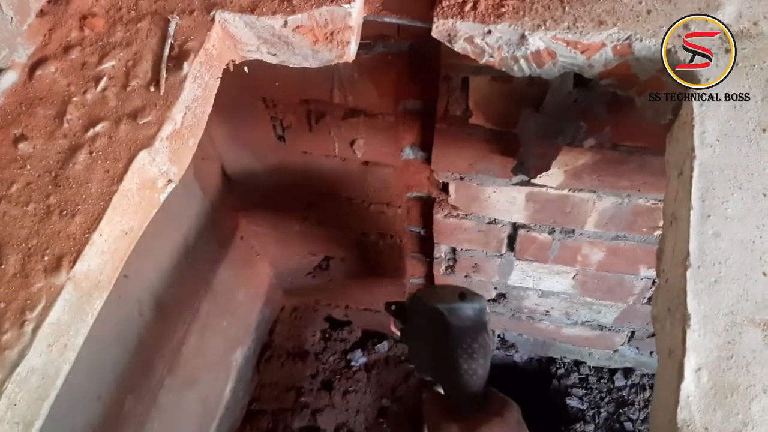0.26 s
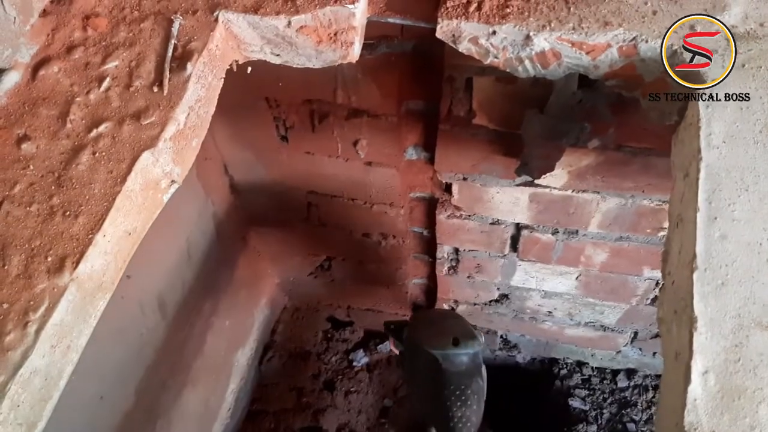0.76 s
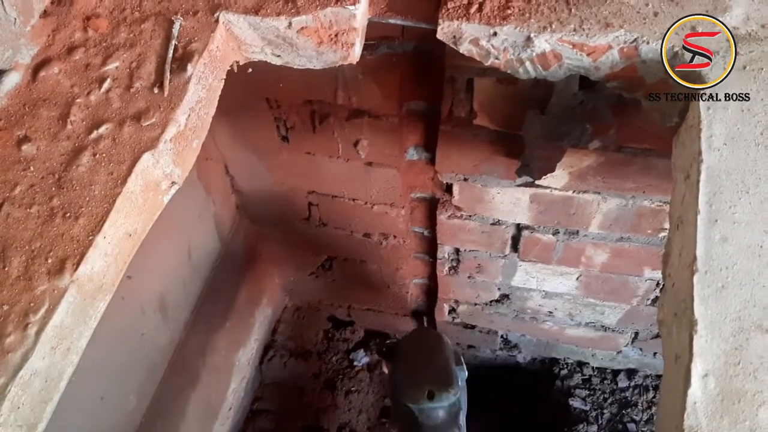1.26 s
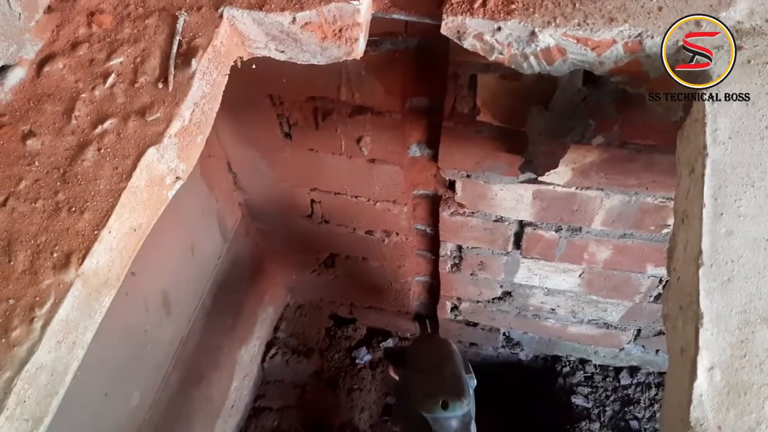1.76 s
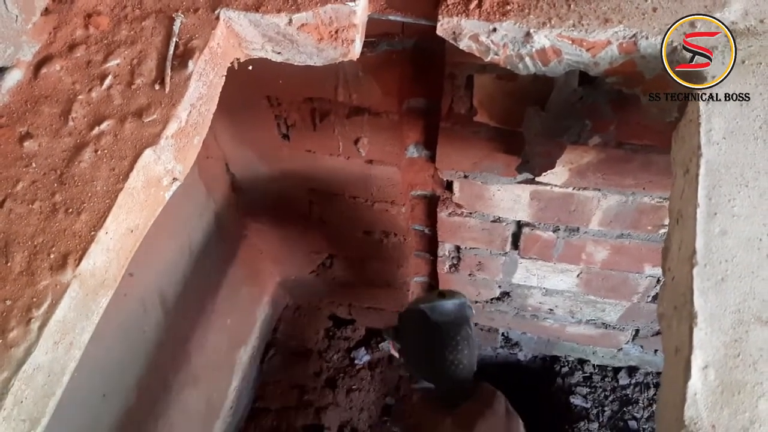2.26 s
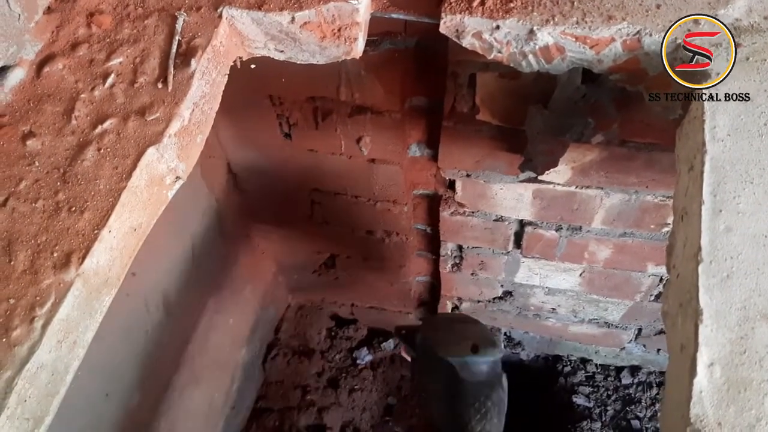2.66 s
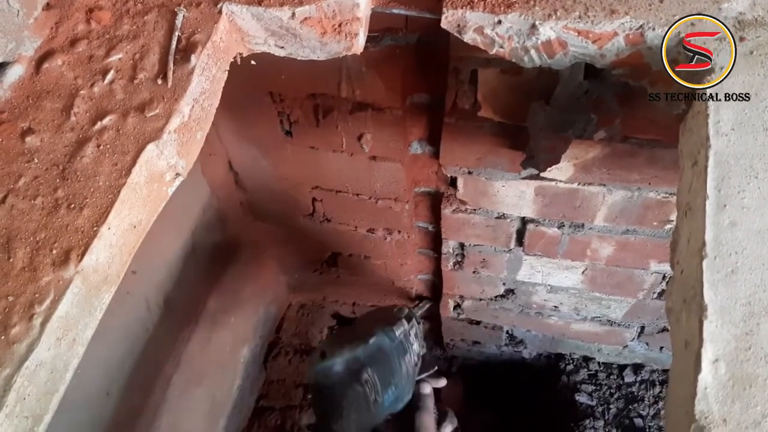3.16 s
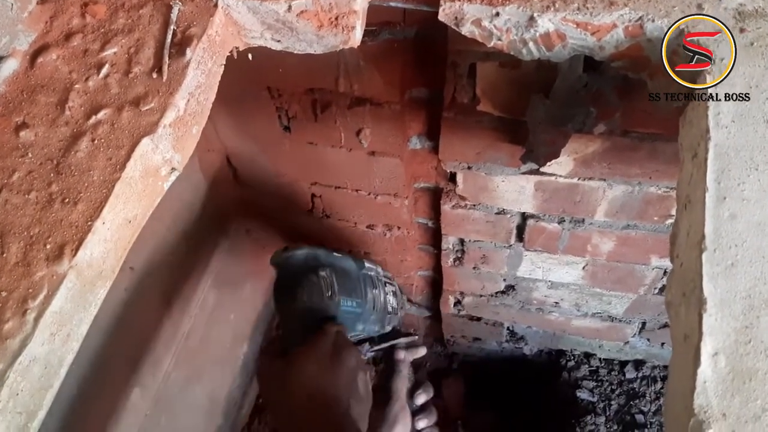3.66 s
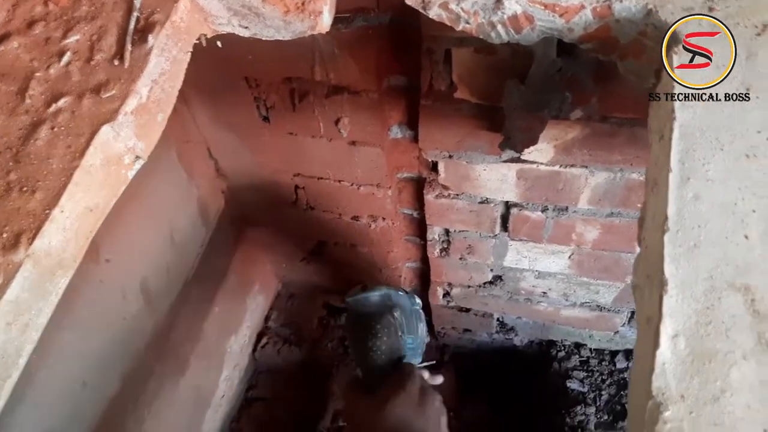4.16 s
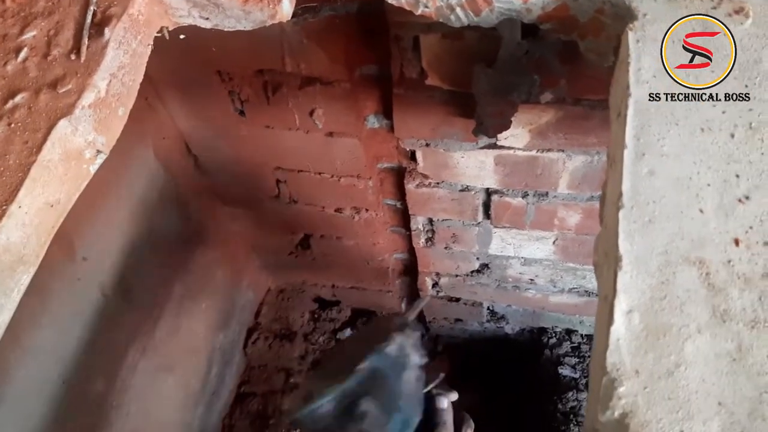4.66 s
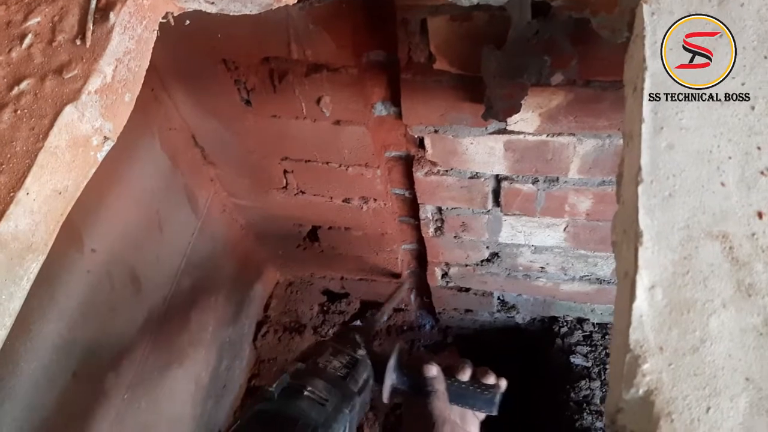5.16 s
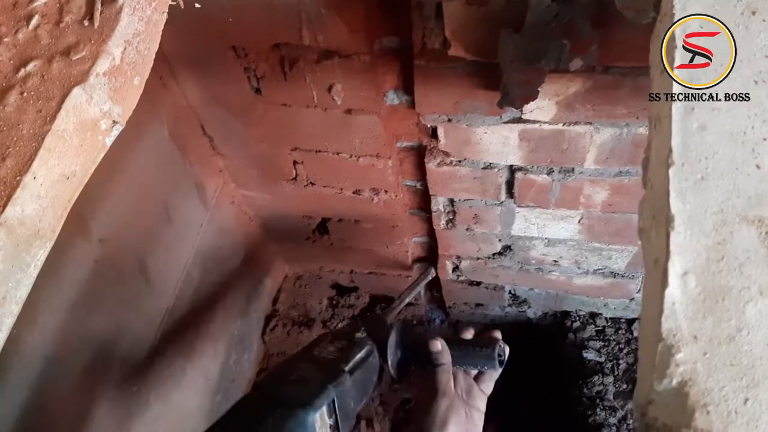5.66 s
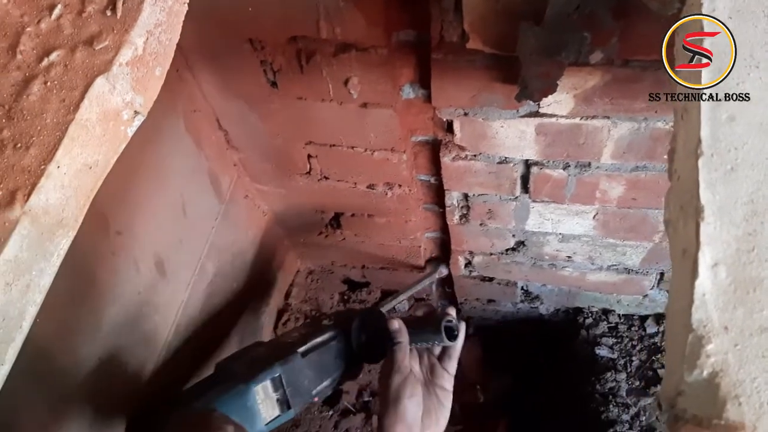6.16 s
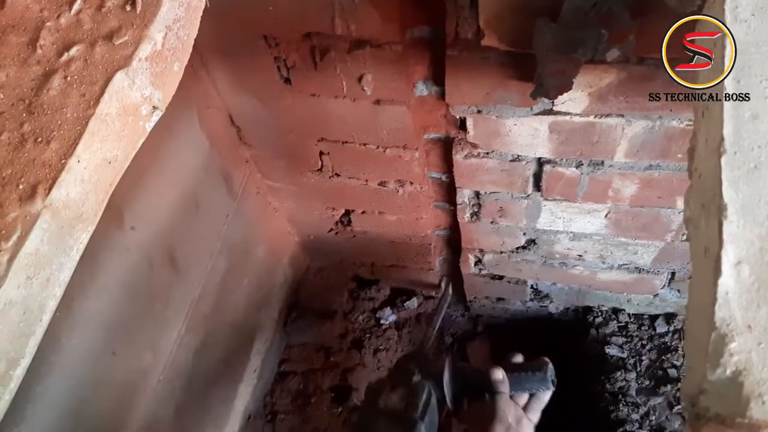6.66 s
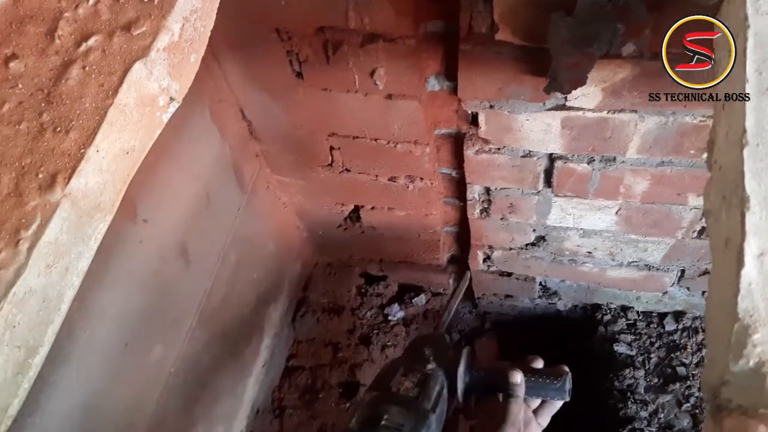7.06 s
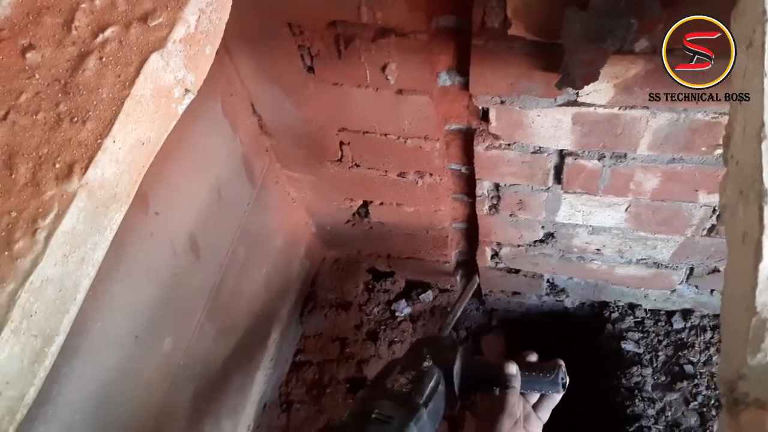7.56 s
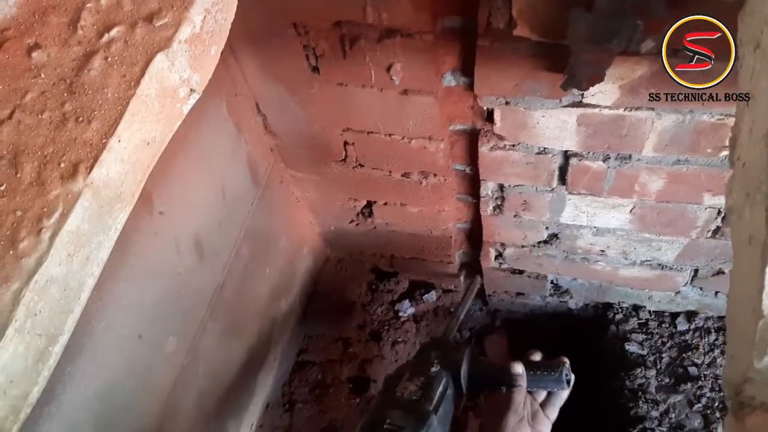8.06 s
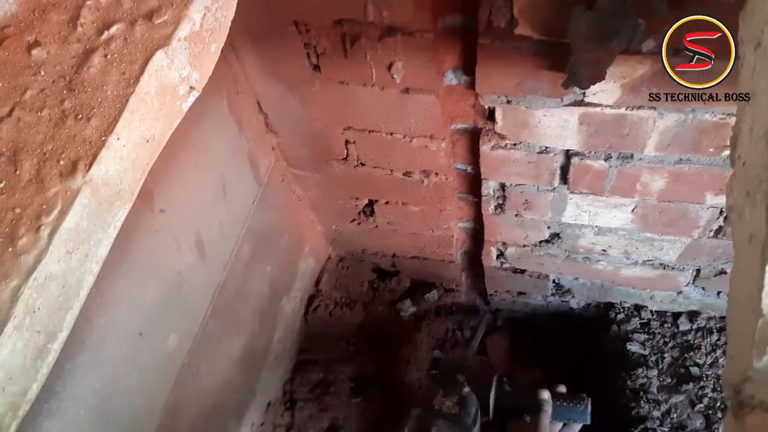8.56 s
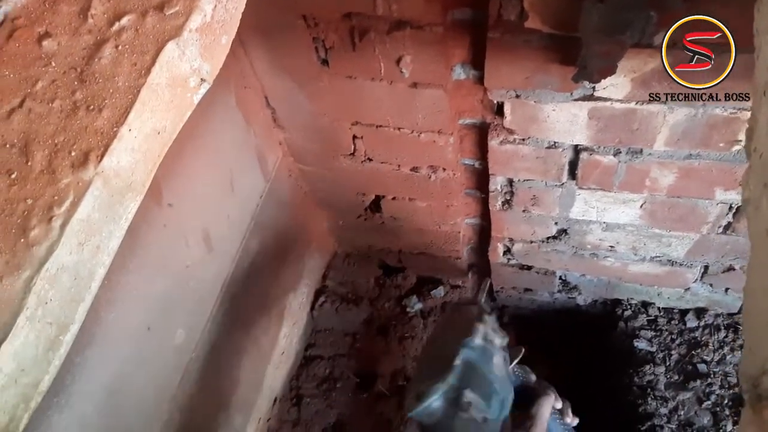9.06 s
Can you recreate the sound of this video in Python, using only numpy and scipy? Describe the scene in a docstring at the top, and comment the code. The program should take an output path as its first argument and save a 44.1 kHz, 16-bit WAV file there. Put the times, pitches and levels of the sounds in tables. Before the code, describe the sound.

Close, harsh hammer-drill chiselling on brick in a small walled alcove: a long roar, then shrinking bursts separated by whirring, clanking run-downs and near silence.

```python
"""A small plastered alcove: an electric chipping hammer chisels brick, one long run and then three bursts.
Every crank turn fires the striker: shaped impulses crack the brick, ring the steel and thud in the wall.
After each release the motor coasts down with clacking gears: noise and tooth tones timed by the crank angle.
Chips thump the microphone; noise bursts knock on brick, hard as each burst starts, faintly in the pauses.
The near walls answer with short, dense decaying noise; a low rumble lies in the distance."""
import sys
import numpy as np
from scipy import signal
from scipy.fft import rfft, irfft, next_fast_len
from scipy.io import wavfile
from scipy.ndimage import uniform_filter1d, map_coordinates

SR = 44100
rng = np.random.default_rng(int(sys.argv[2]) if len(sys.argv) > 2 else 0)


def output_pcm(signal):
    """Save a mono or channel-first signal as 16-bit PCM at the path in sys.argv[1].

    Samples are clipped to [-1, 1] before scaling.
    """
    pcm = np.clip(np.atleast_2d(signal).T, -1, 1) * 32767
    wavfile.write(sys.argv[1], SR, np.round(pcm).astype(np.int16))


N = 410571


def amp(db):
    """Decibels to gain."""
    return 10 ** (np.asarray(db) / 20)


def unit(x):
    """Scale to rms 1."""
    return x / np.sqrt(np.mean(x ** 2) + 1e-20)


def steady(x):
    """Level x to about rms 1 over every tenth of a second, keeping the single blows."""
    power = np.mean(x ** 2, axis=0)
    power = uniform_filter1d(uniform_filter1d(power, size=3500), size=3500)
    return x / np.sqrt(np.abs(power) + np.mean(power) / 10 ** 4)


def along(points, hz):
    """Read (frequency [Hz], value) points on a log frequency axis."""
    f, v = np.transpose(points)
    return np.interp(np.log(hz + 1), np.log(f + 1), v)


def curves(rows):
    """One value per sample for each column after the time."""
    s, *cols = np.transpose(rows)
    return [np.interp(np.arange(N) / SR, s, c) for c in cols]


def wobble(rate):
    """A smooth random curve with this many knots a second."""
    knots = rng.standard_normal(int(N * rate / SR) + 4)
    return map_coordinates(knots, [np.arange(N) * rate / SR])


def filtered(x, response):
    """Multiply the spectrum of x by a complex response of frequency."""
    length = x.shape[-1]
    size = 2 * next_fast_len((length + SR // 2) // 2)
    spectrum = rfft(x, size) * response(np.fft.rfftfreq(size, 1 / SR))
    return irfft(spectrum, size)[..., :length]


def colour(x, points):
    """Causal minimum-phase filter with the gain of (frequency [Hz], level [dB]) points."""
    def response(hz):
        cepstrum = irfft(np.log(amp(along(points, hz))))
        cepstrum[1:len(hz) - 1] *= 2
        cepstrum[len(hz):] = 0
        return np.exp(rfft(cepstrum))
    return filtered(x, response)


def resonate(x, modes):
    """Pass x through (frequency [Hz], width [Hz], level [dB]) resonances of alternating sign."""
    def response(f):
        total = 0
        for k, (c, w, db) in enumerate(modes):
            total = total + (-1) ** k * amp(db) * 1j * f * w / (c * c - f * f + 1j * f * w)
        return total
    return filtered(x, response)


def fade(x, life):
    """Every impulse dies away with this time constant in seconds."""
    return signal.lfilter([1], [1, -np.exp(-1 / (life * SR))], x)


def noise(side_db):
    """Stereo white noise, partly shared by both channels."""
    mid, side = rng.standard_normal((2, N))
    return unit(np.array([mid + amp(side_db) * side, mid - amp(side_db) * side]))


def swell(turns, share, width):
    """A smooth bump once a turn, centred on this share of the turn."""
    return np.exp(-.5 * (((turns - share + .5) % 1 - .5) / width) ** 2)


# how long the near plaster walls answer: (frequency [Hz], 60 dB decay time [s])
WALL_DECAY = [(150, 0.3), (1500, 0.11), (6000, 0.18), (15000, 0.014)]


def alcove(x, wet_db):
    """Direct sound plus the short, dense answer of the near walls."""
    hz, t, z = signal.stft(rng.standard_normal((3, SR // 3)), SR, nperseg=256)
    decay = amp(-60 * t / along(WALL_DECAY, hz)[:, None])
    left, right, shared = signal.istft(z * decay, SR, nperseg=256)[1]
    tail = np.array([left, right]) + 0.94 * shared
    tail = tail / np.linalg.norm(tail[0])
    return x + amp(wet_db) * signal.fftconvolve(np.atleast_2d(x), tail, axes=1)[:, :N]


def roaming(x, wet_db):
    """The answer of the walls keeps changing as the tool moves about."""
    angle = 2 * wobble(2)
    return np.cos(angle) ** 2 * alcove(x, wet_db) + np.sin(angle) ** 2 * alcove(x, wet_db)


# the crank: top speed, gain on a firmly seated chisel and bearing drag [turns per s]
FULL_SPEED, SEATED_GAIN, DRAG = 66.3, 1.4, 9.7
SEATED_UNTIL_S = 1.57
# pulls of the trigger: (pressed [s], released [s], spin-up time constant [s],
# coasting time constant [s], crank angle at release [turns])
TRIGGER_PULLS = [(-2, 2.157, .2, .9315, .31), (3.21, 4.1993, .208, .7035, .451),
                 (6.01, 6.467, .19, .7007, .301), (7.975, 8.2636, .18, .6924, .913)]


def motor():
    """Speed swells to its top under the trigger, then friction brakes it: speed, turns, drive 0-1, run."""
    t = np.arange(N) / SR
    speeds, turns = [], []
    for on, off, spin_up, coast, angle in TRIGGER_PULLS:
        held = np.clip(np.minimum(t, off) - on, 0, None)
        driven = FULL_SPEED * (1 - np.exp(-(held / spin_up) ** 1.5))
        driven = driven + SEATED_GAIN * (t < SEATED_UNTIL_S)
        # constant drag brings the coasting crank to a full stop
        speed = np.maximum((driven + DRAG) * np.exp(-np.maximum(t - off, 0) / coast) - DRAG, 0)
        turned = np.cumsum(speed) / SR
        speeds.append(speed)
        turns.append(turned - np.interp(off, t, turned) + angle)
    run = np.argmax(speeds, axis=0)
    drive = uniform_filter1d(1.0 * (t < np.array(TRIGGER_PULLS)[run, 1]), size=2200)
    return np.choose(run, speeds), np.choose(run, turns), drive, run


BITE_ATTACK_S = 0.0067
# the chisel is leaned into the brick: (start [s], end [s], release [dB per s],
# then relative levels: crack [dB], thud [dB], ring [dB], housing buzz [dB])
LEANED_BITES = [(-.1, 0.54, 63, -30, -46, -28.5, -29.5), (0.577, 1.57, 143.5, -27.5, -30.5, -29.5, -29),
                (1.596, 2.241, 297, -28, -32.5, -25.5, -38.5), (3.41, 3.537, 66, -32.5, -57, -30.5, -39.5),
                (3.55, 3.86, 198.5, -31.5, -33, -27, -37.5), (3.863, 4.3, 272, -28, -31.5, -27, -40.5),
                (4.458, 4.58, 95.5, -35, -49, -39, -48), (6.196, 6.31, 96.5, -35.5, -33, -29.5, -61),
                (6.299, 6.37, 139.5, -37.5, -28, -26.5, -54.5),
                (6.481, 6.55, 166, -31.5, -31.5, -28, -60.5), (6.59, 6.841, 244, -34.5, -46, -38, -68),
                (8.146, 8.401, 258, -32, -31.5, -27.5, -66), (8.44, 8.503, 322, -37, -32.5, -27.5, -67.5)]


def bites():
    """Gains of crack, thud, ring and buzz: each bite sets in quickly, holds and dies away."""
    t = np.arange(N) / SR
    gains = np.zeros((4, N))
    for start, end, release, *levels_db in LEANED_BITES:
        attack = np.clip((t - start) / BITE_ATTACK_S + .5, 0, 1)
        shape = attack * amp(-abs(release) * np.maximum(t - end, 0))
        gains = np.maximum(gains, amp(levels_db)[:, None] * shape)
    return gains


# the unloaded striker only taps; rows crack, thud, ring:
# (level against the gears [dB], loss per halving of the speed [dB])
IDLE_TAPS = [(-6, 6.5), (-5.5, 8), (-23.5, 1)]


def blow_gains(pressed, gear_db, halvings):
    """Add the power of the idle taps, which weaken with the speed, to that of the bites."""
    return [np.hypot(gain, amp(gear_db + db - slope * halvings))
            for gain, (db, slope) in zip(pressed, IDLE_TAPS)]


def impacts(turns, pattern, scatter_db, jitter):
    """An impulse whenever the crank passes a point of the pattern; jitter in seconds."""
    out = np.zeros(N)
    for share, db in pattern:
        at = np.flatnonzero(np.diff(np.floor(turns - share)))
        size, late = rng.uniform(-1.1, 1, (2, len(at)))
        landed = np.round(at + late * jitter * SR).astype(int)
        out[np.clip(landed, 0, N - 1)] += amp(db + scatter_db * size)
    return out


def disperse(x, spread):
    """Bending waves in the steel carry the treble ahead of the bass."""
    return filtered(x, lambda hz: np.exp(-1j * spread * np.sqrt(hz)))


def tint(x, db):
    """Tilt the sound towards the treble or the bass from moment to moment."""
    treble = filtered(x, lambda hz: hz ** 2 / (hz ** 2 + 2800 ** 2))
    return amp(db) * treble + amp(-db) * (x - treble)


def shifted(x, hz):
    """Move every frequency of x by a curve of hertz."""
    analytic = signal.hilbert(x, next_fast_len(N))[..., :N]
    return np.real(analytic * np.exp(2j * np.pi * np.cumsum(hz) / SR))


TINT_DB = 7  # scale of the random tilt of loose blows
# impacts within a crank turn: (share of the turn, relative level [dB])
STROKE_IMPACTS = [(0.237, -7.5), (0.283, -16), (0.373, 1), (0.469, -9), (0.689, -16)]
# spectra of cracking brick, thudding wall and ringing steel: (frequency [Hz], relative level [dB])
CRACK_SPECTRUM = [(400, -11), (800, -0.5), (1200, 3.5), (2000, -0.5), (3200, -4), (4200, 0), (5800, -7.5),
                  (8300, -6.5), (9500, -15), (11000, -10.5), (16000, -15)]
THUD_SPECTRUM = [(40, -26.5), (110, -0.5), (190, -11), (300, 3.5), (450, 1.5), (650, -3.5), (1200, -5),
                 (3000, -44.5)]
STEEL_SPECTRUM = [(7000, -42), (8400, -18), (9500, -27.5), (11300, -8.5), (12300, 2), (13300, -5),
                  (14400, -7), (15400, -11), (16500, -17.5)]
# ringing of the chisel: (frequency [Hz], width [Hz], relative level [dB])
CHISEL_MODES = [(12310, 55, 0), (12550, 290, -16), (15300, 250, -16)]
# its lower modes, free when it is held at a slant: (frequency [Hz], width [Hz], relative level [dB])
SLANT_MODES = [(5400, 400, -11), (8370, 240, -1.5)]
# pressure on the chisel detunes its ring: (time [s], shift [Hz])
RING_SHIFT = [(0, -100), (.42, 170), (1.35, -280), (1.9, 260), (2.2, 60), (4.05, 0)]


def chisel(turns, speed, loose, crack_gain, thud_gain, ring_gain):
    """Each blow cracks the brick, rings the steel and thuds in the wall."""
    # a loose chisel smears its blows and chatters between them
    blows = impacts(turns, STROKE_IMPACTS, scatter_db=2.5, jitter=.00005)
    between = [(.1, -8.5), (.55, -10), (.9, -11.5)]
    chatter = loose * impacts(turns, between, scatter_db=11.0, jitter=0.0019)
    hits = (blows + chatter) * amp(1.2 * loose * wobble(35))
    firm = np.clip((speed - 35) / 30, 0, 1)
    # at a crawl the striker no longer reaches the chisel
    reach = np.clip((speed - 17) / 18, 0, 1)

    grind = 0.05 + reach * (0.2 + .5 * loose) * swell(turns, 0.42, width=0.085)
    crumble = (firm * fade(hits, life=0.0005) + grind) * noise(side_db=-4)
    shock = disperse(firm * hits, spread=0.4777)
    crack = tint(colour(3.6 * shock + crumble, CRACK_SPECTRUM), TINT_DB * loose * wobble(45))
    crack = steady(roaming(crack, wet_db=-2))

    sting_shape = reach * fade(hits, life=0.00086) + 0.077 * reach * swell(turns, 0.39, width=0.14) + .01
    sting = sting_shape * noise(side_db=2.5)
    ring = steady(colour(sting, STEEL_SPECTRUM))
    # only hard blows wake the chisel's own clear note
    hard = np.clip(ring_gain / amp(-28), 0, 1)
    ring = ring + hard * amp(-9 + 12 * loose) * steady(resonate(sting, CHISEL_MODES))
    ring = shifted(ring, curves(RING_SHIFT)[0])
    slant_db = np.interp(np.arange(N) / SR, [2.5, 4.5], [-22, -6])
    ring = ring + amp(slant_db) * steady(resonate(sting, SLANT_MODES))
    ring = steady(alcove(ring, wet_db=0.0))

    thud = steady(colour(4 * shock + crumble, THUD_SPECTRUM))
    return amp(4.0) * crack_gain * crack + amp(4.5) * ring_gain * ring + amp(-0.5) * thud_gain * thud


BUZZ_WANDER_DB = 2.5  # each line swells and sinks as the grip shifts
STRIKE_AT = .385  # the striker lands at this share of the crank turn
# lines of the buzz: (multiple of the crank speed, relative level [dB])
BUZZ_LINES = [(2, -11), (3, -4.5), (4, -13.5), (5, -1), (6, -2.5), (7, 0), (9, -7.5), (10, 1), (11, -1),
              (12, 0), (13, 4), (16, 3.5), (18, 1), (19, -0.5), (23, 1.5), (28, 2.5), (30, -10.5),
              (32, 3.5), (34, 0), (35, -3)]


def buzz(turns):
    """The housing shakes at exact multiples of the stroke rate, all kicked together by the blow."""
    lines = 0
    for order, db in BUZZ_LINES:
        # the two channels hear each line at slightly different phases
        phase = .7 * rng.standard_normal() + .5 * rng.standard_normal((2, 1))
        level = amp(db + BUZZ_WANDER_DB * wobble(2.5))
        lines = lines + level * np.sin(2 * np.pi * order * (turns - STRIKE_AT) + phase)
    return unit(lines)


# blows that land squarely: (time [s], relative level [dB])
SQUARE_BLOWS = [(6.186, -22), (6.271, -17), (6.311, -16.5), (6.323, -16), (6.341, -13.5), (6.357, -17),
                (6.374, -23), (6.405, -13.5), (6.5, -18), (8.191, -17.5), (8.296, -22), (8.331, -12)]
# their spectrum: (frequency [Hz], relative level [dB])
SQUARE_SPECTRUM = [(80, -17), (280, 4.5), (550, 2), (1100, -7.5), (4500, -15), (12000, -35)]


def punches():
    """A blow that lands squarely thumps the wall and cracks the brick: a decaying noise burst."""
    hits = np.zeros(N)
    for s, db in SQUARE_BLOWS:
        hits[round(s * SR)] = amp(db)
    burst = fade(hits, life=0.0032) * unit(colour(noise(side_db=-4.5), SQUARE_SPECTRUM))
    return alcove(burst, wet_db=-9)


def drifting(turns, rows, life):
    """Each blow excites a narrow resonance whose pitch drifts as the chisel works on."""
    hz, db = curves(rows)
    t = np.arange(N) / SR
    ringing = unit(fade(swell(turns, .38, width=.08) * noise(side_db=-2), life))
    present = (t > rows[0][0]) * (t < rows[-1][0])
    return present * amp(db) * ringing * np.sqrt(2) * np.sin(2 * np.pi * np.cumsum(hz) / SR)


# three drifting resonances: (time [s], pitch [Hz], level [dB])
# shrill, sinking as the chisel works deeper
SHRILL_DRIFT = [(.5, 7980, -54), (.85, 7460, -38), (1.1, 7250, -35.5), (1.301, 6880, -33),
                (1.42, 6850, -34), (1.6, 6800, -59)]
# the brick under the chisel sounds hollow
HOLLOW_DRIFT = [(3.38, 519, -65), (3.469, 519.5, -38), (3.75, 629.5, -31), (4.149, 615, -36),
                (4.6, 561, -63.5), (4.8, 560, -110), (6.1, 450, -110), (6.2, 450, -49), (6.3, 458.6, -35.5),
                (6.7, 451, -39.5), (7.1, 450, -77)]
# the housing moans as the first burst after the long run is leaned on
MOAN_DRIFT = [(3.6, 1750, -42.5), (4.15, 1715, -37.5), (4.35, 1700, -43)]


def work_resonances(turns):
    """Shrill, hollow and moaning resonances, each shaken by the blows."""
    shrill = drifting(turns, SHRILL_DRIFT, life=0.0011)
    hollow = drifting(turns, HOLLOW_DRIFT, life=0.0064)
    return shrill + hollow + drifting(turns, MOAN_DRIFT, life=0.005)


# the chisel rebounds freely: (time [s], relative level [dB])
REBOUNDS = [(4.28, -17), (6.311, -16), (6.472, -22), (8.128, -10), (8.191, -15), (8.281, -15), (8.37, -15),
            (8.451, -14), (8.496, -19)]
# its bending modes: (frequency [Hz], relative level [dB], 60 dB decay time [s])
BENDING_MODES = [(5200, -9, 0.03), (8490, -7, .05), (12315, 5, .11)]


def pings():
    """A rebound leaves the steel free to ring in decaying sines."""
    out = np.zeros(N + SR)
    t = np.arange(SR // 4) / SR
    for s, db in REBOUNDS:
        ring = sum(amp(db + level - 60 * t / t60) * np.sin(2 * np.pi * hz * t)
                   for hz, level, t60 in BENDING_MODES)
        out[round(s * SR):][:len(t)] += (1 - np.exp(-t / 0.0023)) * ring
    return out[:N]


# the gears: relative level at top speed [dB], extra loss per halving of the speed while pulled tight [dB]
GEAR_DB, DRIVEN_SLOPE_DB = -30, 2.5
# below this speed [turns per s] the rattle dies out, by so many more dB per halving
CRAWL_SPEED, CRAWL_SLOPE_DB = 22.9, 9.5


def gear_level(halvings, speed, drive, coast_slope_db, backlash):
    """Gear level in dB: it sinks with each halving of the speed, faster at a crawl."""
    crawl = np.maximum(np.log2(CRAWL_SPEED / np.maximum(speed, 1)), 0)
    slope_db = coast_slope_db + drive * DRIVEN_SLOPE_DB
    return GEAR_DB - halvings * slope_db - CRAWL_SLOPE_DB * backlash * crawl * (1 - drive)


def per_turn(turns, size):
    """Surface roughness that comes round again with every crank turn."""
    return np.interp(turns % 1, np.arange(size) / size, rng.standard_normal(size), period=1)


def whine(turns):
    """Tooth-meshing tones come in rough, broken surges and glide down through the resonances."""
    mesh = 2 * np.pi * 34 * turns
    tones = 0
    for k, gain in [(1, .75), (2, 1), (3, .7), (4, .25)]:
        tone = np.sin(k * mesh + 1.1 / np.sqrt(k) * wobble(110))
        tones = tones + gain * tone * amp(2.2 * wobble(45))
    # each turn of the armature adds side tones
    uneven = 1 + .8 * np.cos(2 * np.pi * 6 * turns)
    surge = .45 + 1.3 * swell(turns, .5, width=.16)
    modes = [(705, 250, -5), (1060, 300, -5.5), (1418, 180, 0.5), (1760, 250, 1.5), (2130, 300, -1.5)]
    return resonate(tones * uneven * surge, modes)


# the housing keeps singing while the tool coasts: (frequency [Hz], width [Hz],
# relative level held upright [dB], relative level held at a slant [dB])
SINGING_MODES = [(728, 29, 3, -18), (1030, 45, -1.5, -7.5), (1460, 30, 4.5, -7), (1615, 36, -7, 3),
                 (1883, 41, -7.5, -3.5), (2240, 75, -5.5, -2.5), (2790, 56, -8.5, -9.5)]


def sung(x, slant):
    """x through the singing modes of the housing, for a tool held upright (0) or at a slant (1)."""
    return resonate(x, [(hz, width, levels_db[slant]) for hz, width, *levels_db in SINGING_MODES])


# within the gearbox sound: whine levels, and its loss as full backlash breaks it up [dB]
WHINE_DRIVEN_DB, WHINE_COASTING_DB, WHINE_MASKED_DB = -9, -0.5, -13
# singing: relative level at top speed, and gain per halving of the speed [dB]
SINGING_DB, SINGING_RISE_DB = -12.5, 4.5
TUBE_COASTING_DB = -17  # relative
# how strongly the cylinder tube sings under power: (time [s], relative level [dB])
TUBE_POWERED = [(0, 6.5), (.35, 3), (.55, -2.5), (4.2, -9.5), (6.3, -26.5)]
# spectrum of the rasping gears: (frequency [Hz], relative level [dB])
GEARBOX_SPECTRUM = [(120, -51.5), (200, -19.5), (412, -8), (540, -11), (708, -13), (1040, -4.5), (1220, -7),
                    (1460, -3), (2130, -5.5), (2460, -12.5), (2950, -5.5), (3470, -8.5), (8120, -20.5),
                    (9550, -26), (15000, -32.5)]
# resonances of the housing: (frequency [Hz], width [Hz], relative level [dB])
HOUSING_MODES = [(618, 41, -2.5), (717, 39, -6), (1030, 100, -7), (1424, 66, -4), (1588, 150, -5),
                 (1800, 140, -10), (2140, 290, -5.5), (2720, 250, -7)]


def gearbox(turns, speed, drive, backlash, run):
    """Gears rasp and whine under load; as they slow down, their backlash clacks twice a turn."""
    slack = np.clip(1 - speed / 62, 0, 1)
    # the last slow turns are gentle
    lively = np.interp(speed, [11, 22], [.2, 1])
    clacks = 5.2 * swell(turns, .39, width=0.075) + 1.6 * swell(turns, 0.84, width=0.025)
    load = 1 + slack * lively * backlash * clacks * amp(3.2 * wobble(26))
    rasp = steady(colour(noise(side_db=-4.0) * load, GEARBOX_SPECTRUM))

    # the armature turns several times per stroke and loads the teeth unevenly
    armature = np.cos(2 * np.pi * 6 * turns)
    roughness = per_turn(turns, size=640) + 1.3 * noise(side_db=-2.5)
    teeth = roughness * (1 + 0.46 * armature) * load
    rattle = steady(resonate(teeth, HOUSING_MODES))
    tube = steady(resonate(teeth, [(2090, 200, 4.0), (2564, 690, -11.5)]))
    tube_db = drive * curves(TUBE_POWERED)[0] + (1 - drive) * TUBE_COASTING_DB

    whine_coasting_db = WHINE_COASTING_DB + WHINE_MASKED_DB * (backlash * lively) ** 2
    whine_db = drive * WHINE_DRIVEN_DB + (1 - drive) * whine_coasting_db
    rub = load * noise(side_db=-4.0)
    # upright in the first run, at a slant afterwards
    singing = steady(np.where(run == 0, sung(rub, slant=0), sung(rub, slant=1)))
    singing_db = SINGING_DB + SINGING_RISE_DB * np.log2(FULL_SPEED / np.maximum(speed, 2))

    body = steady(alcove(rasp + amp(-3.5) * rattle, wet_db=-2.5))
    body = body + amp(whine_db) * whine(turns) + (1 - drive) * amp(singing_db) * singing
    return amp(3.5) * (steady(body) + amp(tube_db - 6.5) * tube)


# each clank shifts the housing modes by about this share and this many dB
CLANK_DETUNE, CLANK_VARY_DB = 0.0085, 3.5
# the loose striker clanks in the slowing tool:
# (time [s], relative level [dB], bright crack against the dull part [dB])
STRIKER_CLANKS = [(2.929, -25, -11), (4.455, -22, 2), (4.616, -28, 10), (4.754, -16, -13),
                  (4.801, -17.5, -27), (4.846, -18, -20), (4.902, -19, -25), (4.959, -22.5, -22),
                  (6.884, -26, -1), (6.912, -16, -7), (6.991, -18, -15), (7.033, -19.5, -14),
                  (7.078, -22.5, -13), (7.127, -26, -8), (7.186, -24, -13), (8.614, -23, 8),
                  (8.648, -32.5, 13.5), (8.686, -22.5, 0), (8.755, -20, -11), (8.801, -23, -8),
                  (8.85, -24, -3), (8.906, -23, -11)]


def clanks():
    """The loose striker scrapes home within milliseconds, cracks and rings the housing anew each time."""
    hits = np.zeros((2, N))
    for s, db, bright_db in STRIKER_CLANKS:
        hits[:, round(s * SR)] = amp([db, db + bright_db])
    dull, bright = fade(hits, life=0.0035) - fade(hits, life=0.00025)
    scrape = noise(side_db=-6.5)
    metal = 1.55 * colour(dull * scrape, GEARBOX_SPECTRUM)
    metal = metal + 1.33 * colour(bright * scrape, CRACK_SPECTRUM)
    t = np.arange(SR // 8) / SR
    for s, db, _ in STRIKER_CLANKS:
        span = slice(round(s * SR), round(s * SR) + len(t))
        modes = []
        for hz, width, _, slant_db in SINGING_MODES:
            detuned = hz * (1 + CLANK_DETUNE * rng.standard_normal())
            modes.append((detuned, width, slant_db + CLANK_VARY_DB * rng.standard_normal()))
        metal[:, span] += 7 * resonate(amp(db) * np.exp(-t / 0.0014) * scrape[:, span], modes)
    return alcove(metal, wet_db=-4.5)


CHIRP_SINK = 2.4  # share of its pitch that a chirp loses per s
# the slowing mechanism chirps: (time [s], pitch [Hz], relative level [dB])
SLOWING_CHIRPS = [(2.932, 2930, -35), (2.99, 1420, -31), (4.36, 1680, -30), (7.263, 1610, -42),
                  (8.935, 1860, -39), (9.0, 1590, -36), (9.15, 1090, -49)]


def chirps():
    """The sinking whine flares up into brief rough squeaks: gliding sines under a smooth bump."""
    t = np.arange(N) / SR
    out = np.zeros(N)
    for s, hz, db in SLOWING_CHIRPS:
        near = np.abs(t - s) < .5
        age = t[near] - s
        squeak = np.sin(2 * np.pi * hz * (age - CHIRP_SINK * age ** 2 / 2))
        out[near] += amp(db) * np.exp(-(age / 0.012) ** 2) * squeak
    return out * (1 + .4 * wobble(300))


# the tool knocks on brick, hard as each burst starts and faintly in the pauses; the dull knock at 7.97 s #
# comes as the motor starts: (time [s], relative level [dB], steel ring against the crunch [dB])
BRICK_KNOCKS = [(3.229, -22, -5), (3.276, -28, -6), (3.371, -29, 10), (3.406, -16, -4), (3.434, -19, -1),
                (3.455, -12.5, -0.5), (5.316, -36, -31), (5.468, -40, -35), (5.695, -52, -16),
                (6.052, -34, -27), (6.113, -18.5, -10), (6.153, -11.5, -2.5), (6.183, -9, -7),
                (6.306, -8, 1), (6.471, -13, 3), (6.56, -10, -6), (7.674, -63, -25), (7.972, -46, -32.5),
                (8.072, -14.5, -1), (8.099, -9.5, 2), (8.126, -7.5, 1.5), (8.277, -11, 5),
                (8.449, -13.5, 1), (9.165, -39, -19), (9.214, -31, 7), (9.236, -24.5, -18)]


def knocks():
    """Single knocks: a dull crunch with a bright ring."""
    out = np.zeros((2, N))
    dull = [(100, -33.0), (400, 7.0), (1800, 4.5), (5000, -2.5), (9500, -8.5), (16000, -25)]
    crunch = unit(colour(noise(side_db=-0.5), dull))
    ring = unit(colour(noise(side_db=0.0), STEEL_SPECTRUM))
    for s, db, ring_db in BRICK_KNOCKS:
        span = slice(round(s * SR), round(s * SR) + SR // 8)
        t = np.arange(crunch[:, span].shape[1]) / SR
        shape = (1 - np.exp(-t / 0.0012)) * amp(db - 5.0 - 60 * t / 0.036)
        out[:, span] += shape * (crunch[:, span] + amp(ring_db) * ring[:, span])
    return alcove(out, wet_db=-2.5)


# where the tool is held: (time [s], lead of the left channel [s])
TOOL_BEARING = [(2.2, 0), (3, .00005), (6.3, .00008), (8, .00005)]


def place(x):
    """The tool's sound reaches the left microphone channel slightly before the right."""
    lead, = curves(TOOL_BEARING)
    left = map_coordinates(x[0], [np.arange(N) + lead * SR], order=5)
    return np.array([left, x[1]])


# chips that hit the microphone: (time [s], relative level [dB])
CHIP_HITS = [(0.625, -15), (0.73, -15), (0.891, -11.5), (0.92, -17), (1.084, -14.5), (1.115, -18.5),
             (1.32, -12), (1.451, -10.5), (1.555, -8), (1.887, -23), (2.164, -16), (3.681, -21),
             (3.818, -16), (4, -17), (4.098, -12), (4.244, -15), (4.262, -15.5), (6.29, -10.5),
             (6.486, -10.5), (6.545, -15), (8.228, -15.5), (8.312, -11), (8.349, -17), (8.453, -16.5),
             (8.476, -27)]


def chips():
    """A chip on the microphone gives one sharp push that swings back slowly."""
    taps = np.zeros((2, N))
    for k, (s, db) in enumerate(CHIP_HITS):
        # each lands nearer to one of the two ports, in turn
        taps[:, round(s * SR)] += amp(db + 1.0 * (-1) ** k * np.array([1, -1]))
    push = filtered(fade(taps, life=0.0012),
                    lambda f: (1j * f / (70 + 1j * f)) ** 2 / (1 + 1j * f / 1100))
    # finer grit patters after each chip; cubing makes the noise spiky
    low = [(20, -29), (60, 5.0), (140, -3.5), (350, -3.0), (1000, -35.5), (4000, -60.5)]
    grit = fade(taps, life=0.027) * unit(colour(noise(side_db=-5.0) ** 3, low))
    return amp(5.5) * push + amp(-10.5) * grit


# spectrum of the distant rumble: (frequency [Hz], relative level [dB])
SITE_SPECTRUM = [(25, -39), (55, -12.5), (120, 2.5), (165, -9.5), (240, -17), (400, -19), (1000, -35),
                 (4000, -45.5), (16000, -46)]


def site():
    """A low distant rumble behind the work: coloured noise of wavering level."""
    return amp(-63.0 + 1.5 * wobble(7.7)) * unit(colour(noise(side_db=-19.5), SITE_SPECTRUM))


STRAIN_DB = 3  # while loose, the gears grow this much louder under the hardest blows
# the chisel is firm above this buzz level [dB] and fully loose this far below it [dB]
SEATED_DB, LOOSE_RANGE_DB = -33, 8
# how each run coasts down: (loss per halving of the speed [dB], gear backlash [0-1])
COAST_DOWNS = [(8, 0.3), (6.5, 0.6), (6.5, .95), (5.5, 0.94)]


def scene():
    """The crank times every part of the hammer and sets its idle level; bites add the sound of brick."""
    speed, turns, drive, run = motor()
    coast_slope_db, backlash = np.array(COAST_DOWNS)[run].T
    halvings = np.log2(FULL_SPEED / np.maximum(speed, 1))
    gear_db = gear_level(halvings, speed, drive, coast_slope_db, backlash)
    *pressed, seated = bites()
    crack, thud, ring = blow_gains(pressed, gear_db, halvings)
    strain = pressed[0] / pressed[0].max()
    # off its seat the chisel skips about
    loose = np.clip((SEATED_DB - 20 * np.log10(seated + 1e-9)) / LOOSE_RANGE_DB, 0, 1)
    gears = amp(gear_db + STRAIN_DB * strain * loose) * gearbox(turns, speed, drive, backlash, run)
    hammer = chisel(turns, speed, loose, crack, thud, ring) + seated * buzz(turns) + gears
    tool = hammer + work_resonances(turns) + punches() + pings() + clanks() + chirps() + knocks()
    return place(tool) + chips() + site()


TOP_HZ = 15950


def record(dry):
    """The recorder keeps nothing above its band limit."""
    return filtered(dry, lambda hz: np.clip((TOP_HZ - hz) / 200 + .5, 0, 1))


dry = scene()
out = record(dry)
output_pcm(out)
```